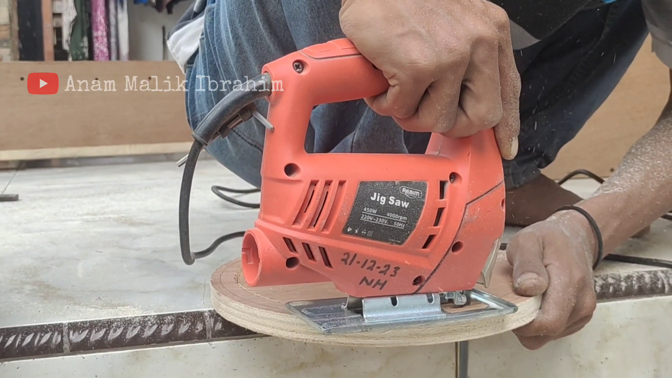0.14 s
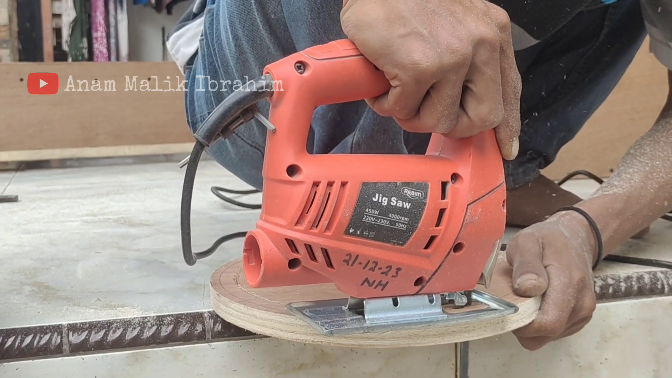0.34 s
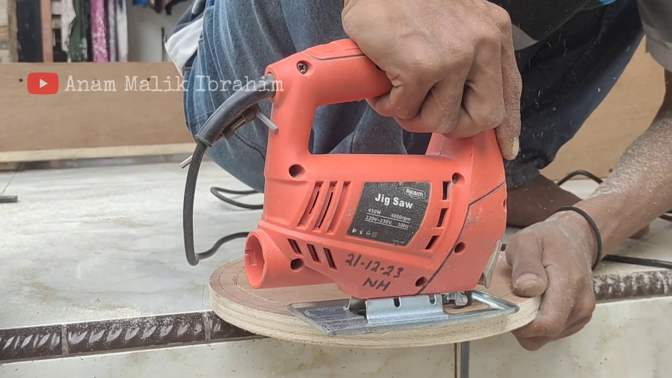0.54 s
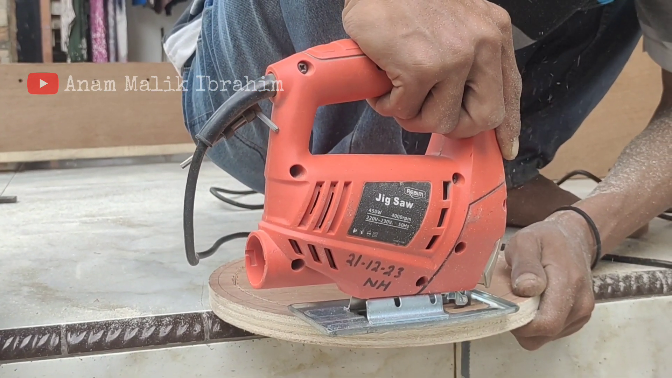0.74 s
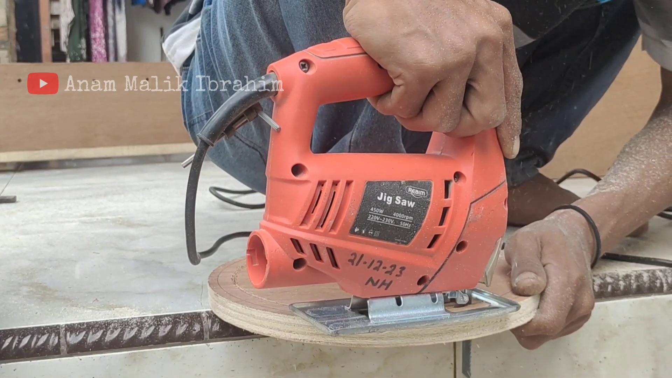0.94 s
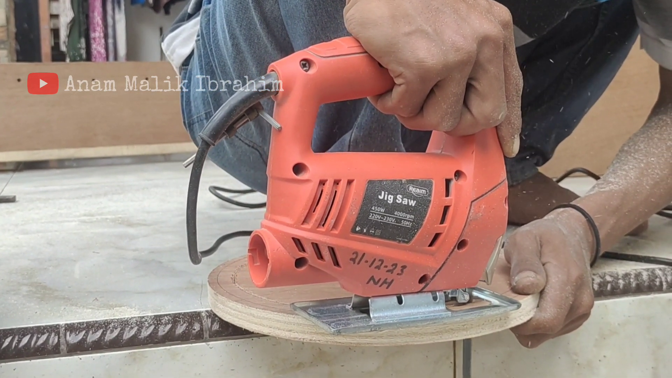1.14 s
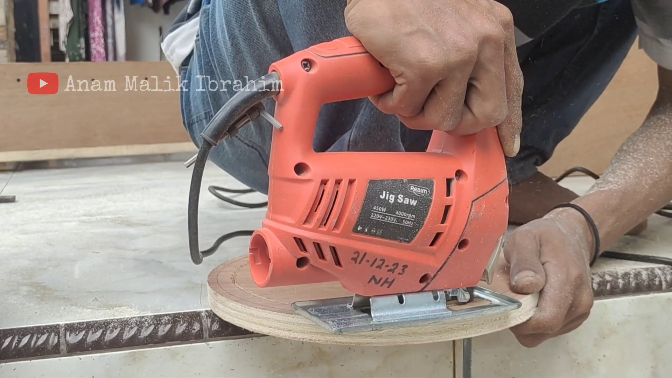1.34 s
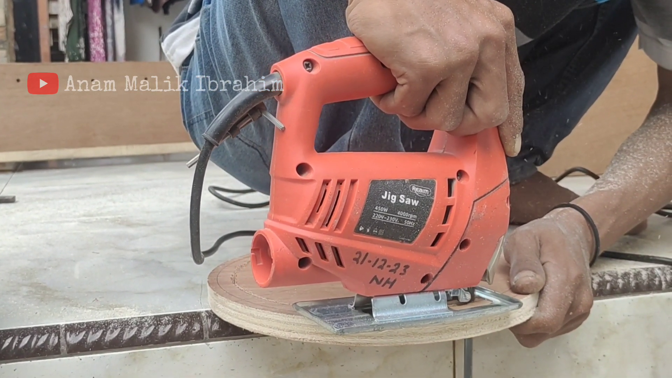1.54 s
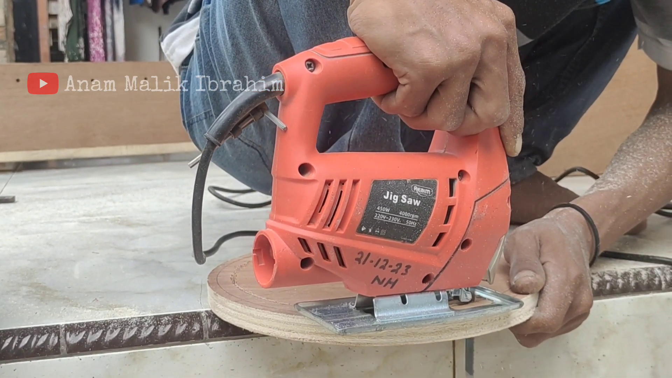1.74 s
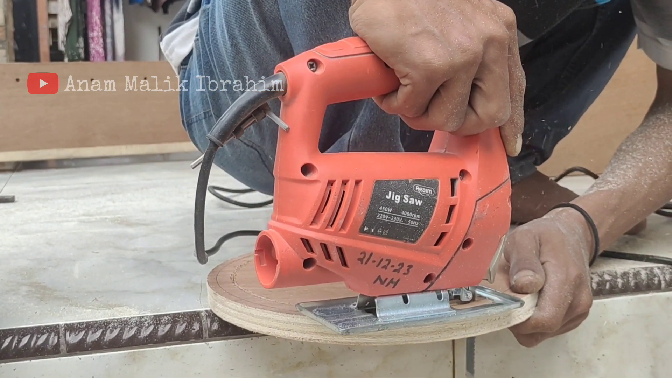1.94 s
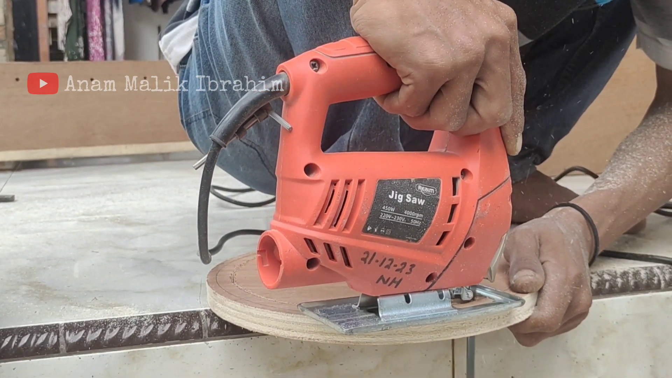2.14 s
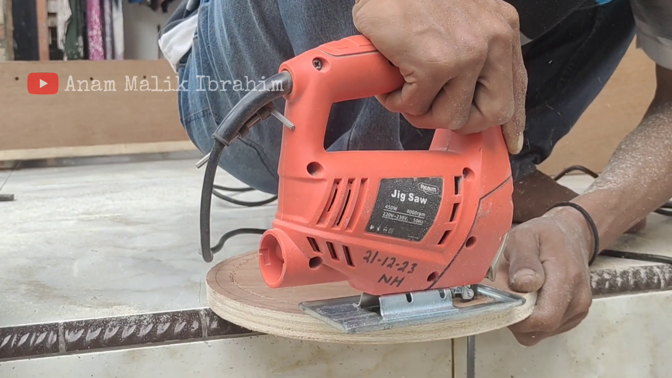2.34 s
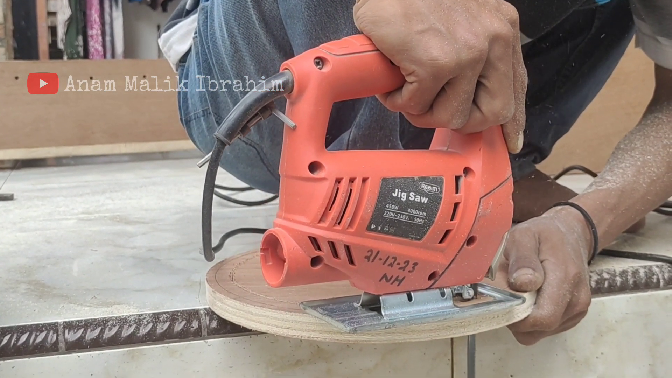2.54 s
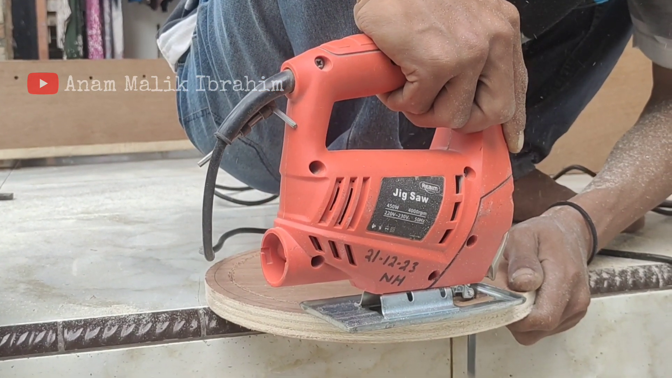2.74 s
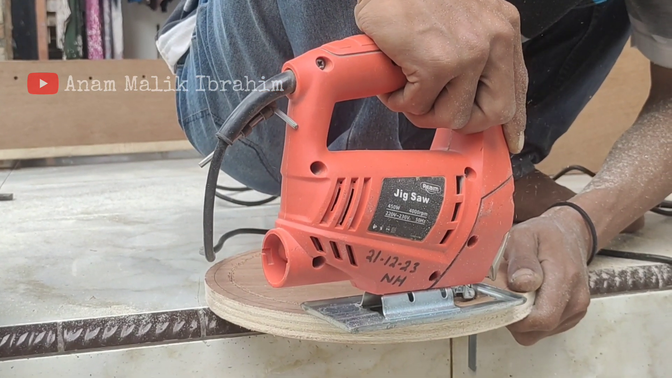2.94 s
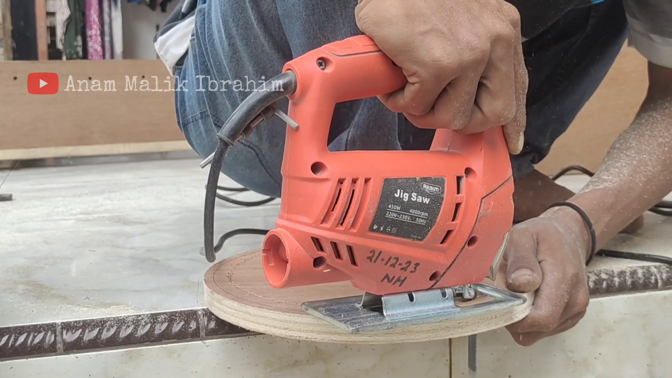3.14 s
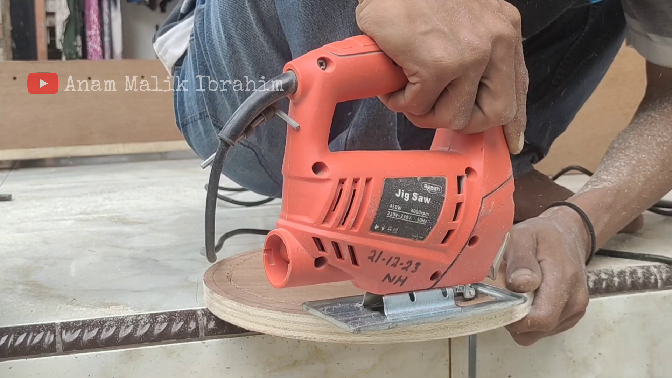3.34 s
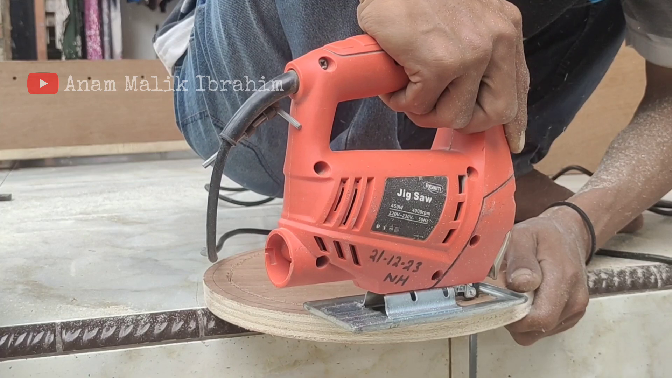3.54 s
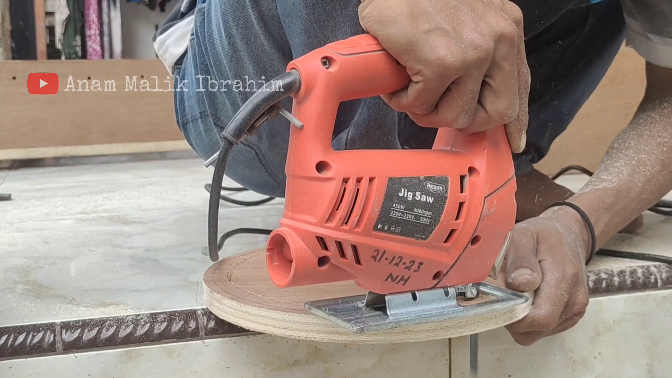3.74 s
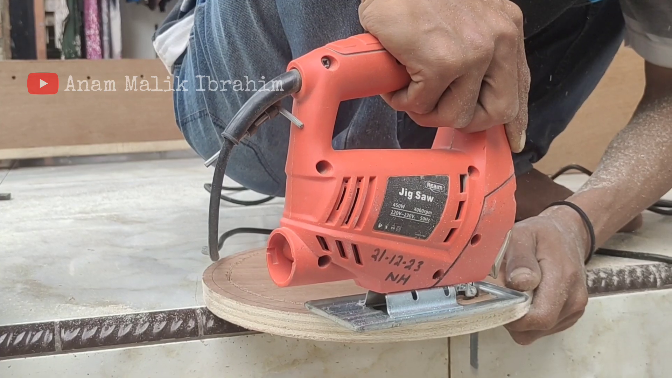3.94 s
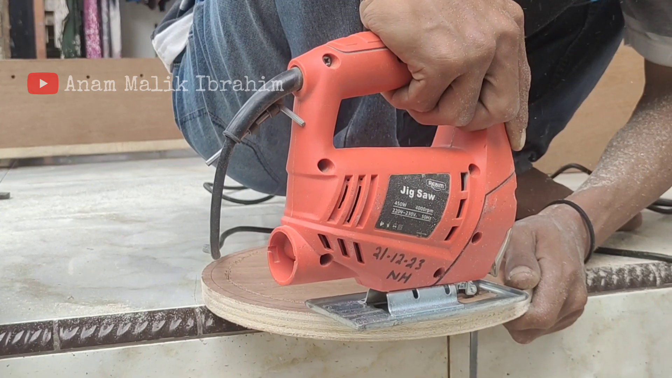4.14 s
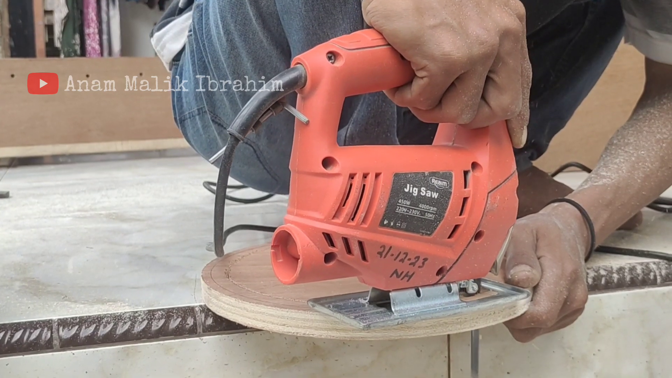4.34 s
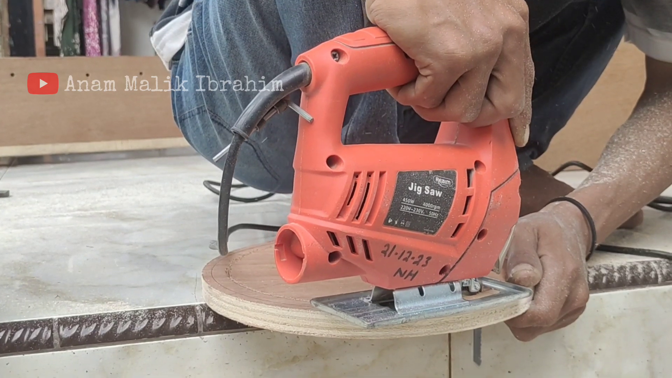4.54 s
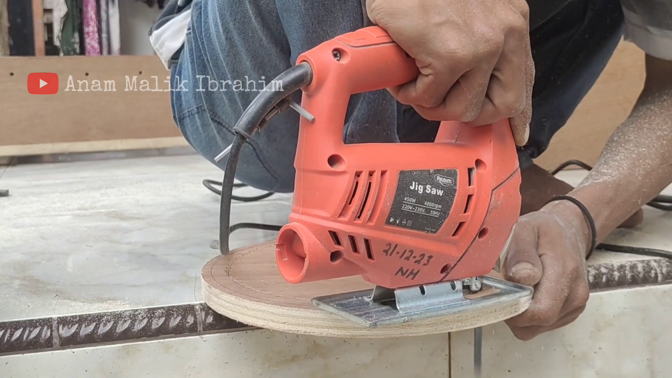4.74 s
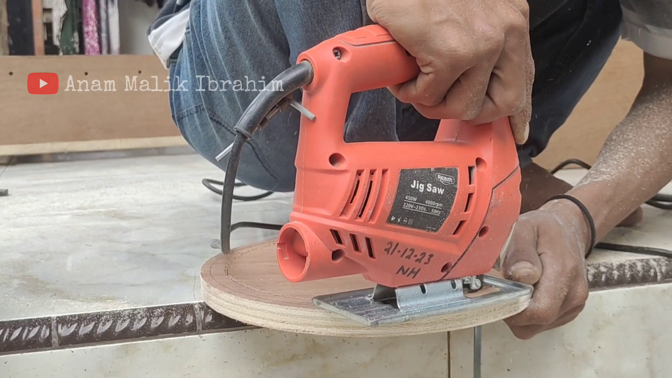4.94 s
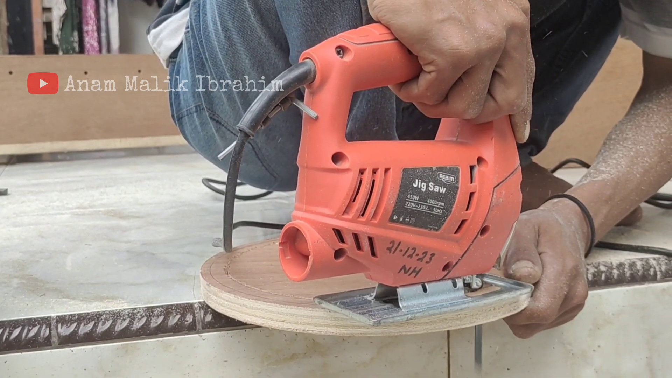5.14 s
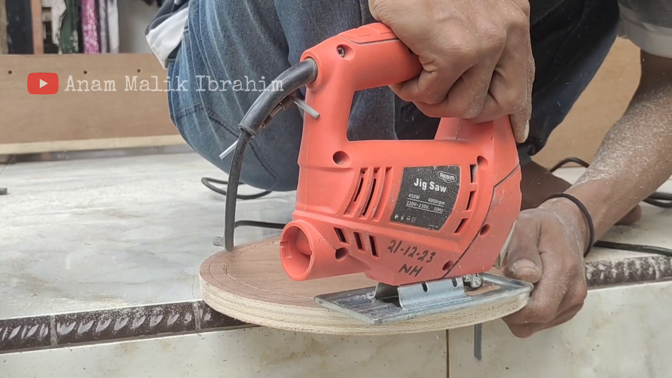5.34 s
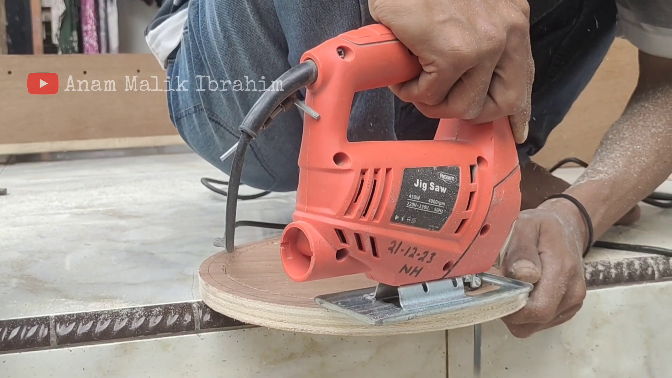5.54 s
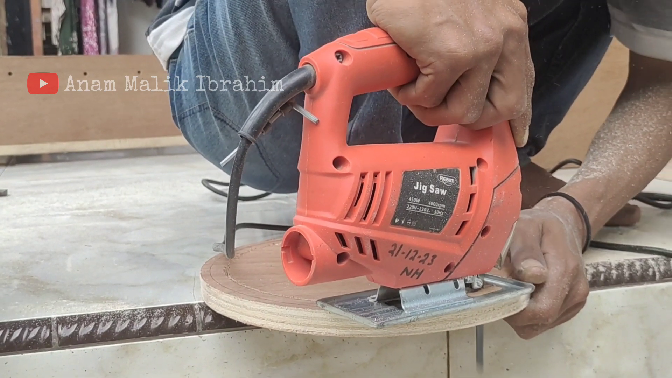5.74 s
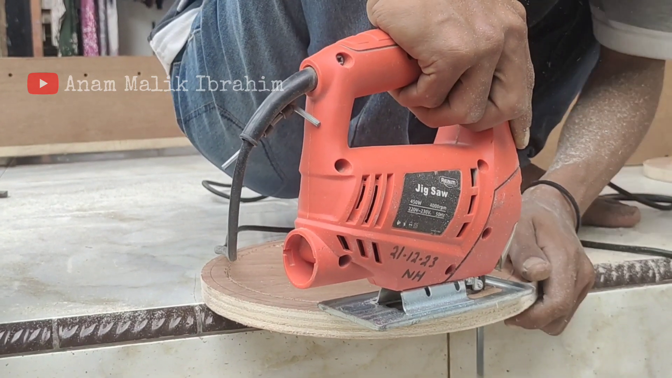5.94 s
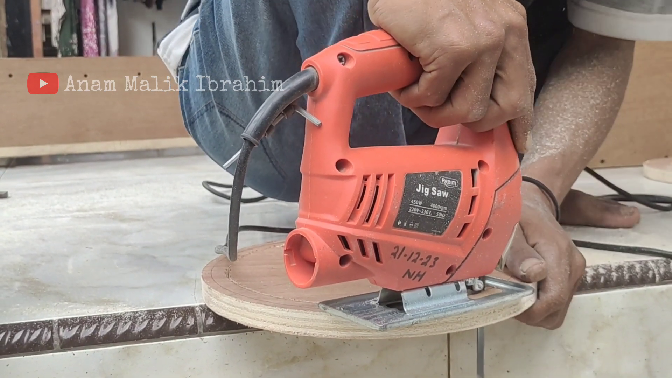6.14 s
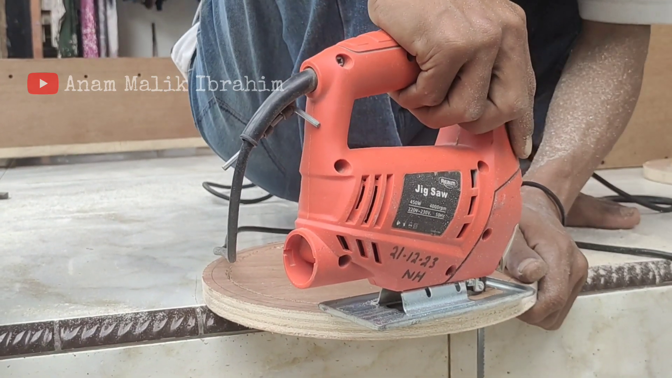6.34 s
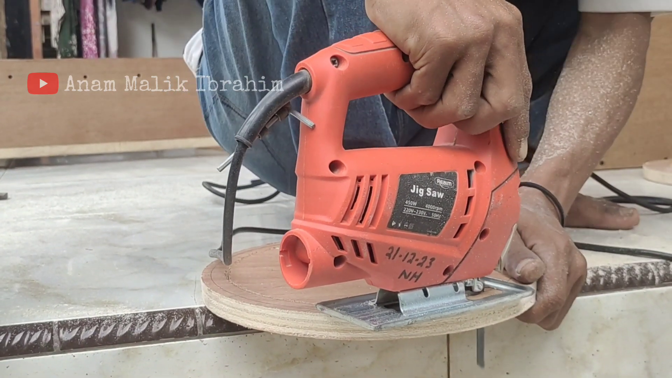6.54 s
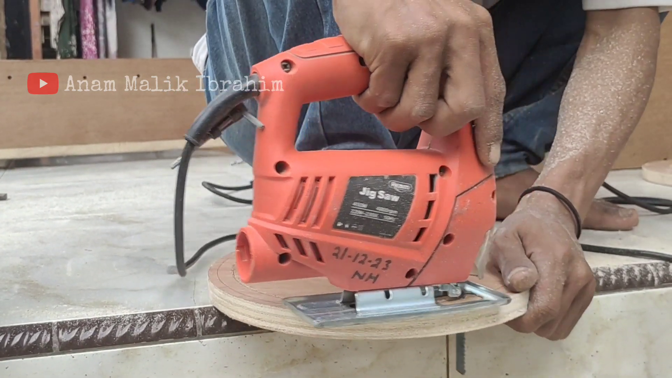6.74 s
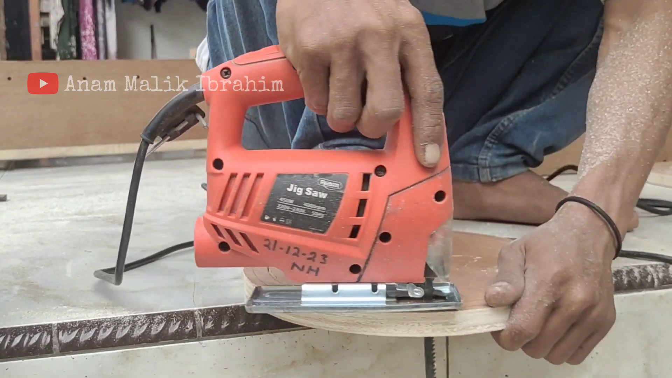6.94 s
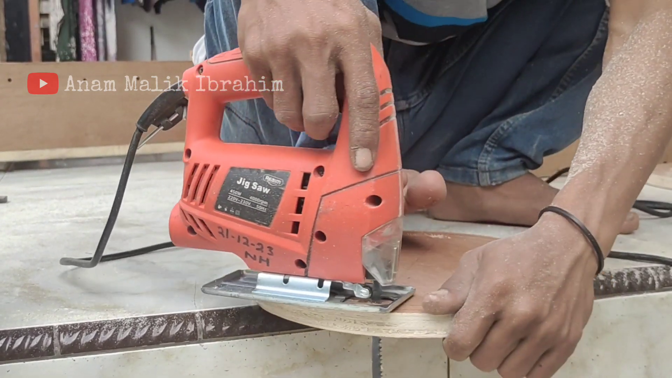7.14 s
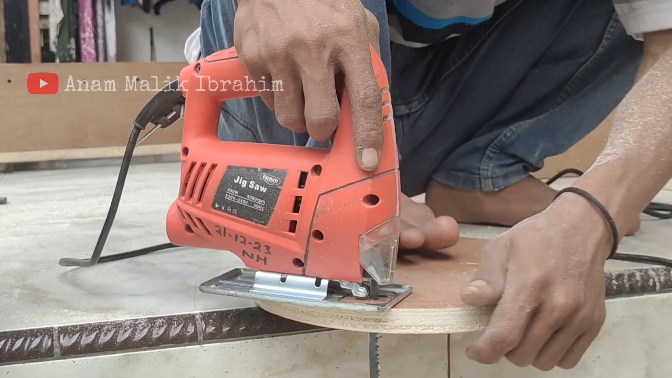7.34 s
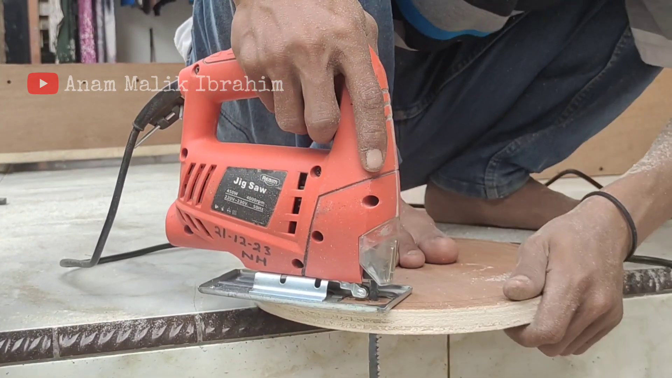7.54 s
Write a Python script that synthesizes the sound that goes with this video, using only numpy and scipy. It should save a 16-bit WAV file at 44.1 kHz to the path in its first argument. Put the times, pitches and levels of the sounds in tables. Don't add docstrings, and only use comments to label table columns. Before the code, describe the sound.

Steady, coarse electric saw drone, already running at the start, with metallic gear chatter, rapid stroke knocking and woody hum, wavering slightly with hand pressure. Near the end the motor is let go and winds down for over a second, the knocks spreading apart until it stops. Faint finger ticks on the plastic shell remain over still indoor air. Close, wide stereo pickup.

```python
import sys
import numpy as np
from scipy import signal
from scipy.fft import rfft, irfft
from scipy.io import wavfile

SR = 44100
rng = np.random.default_rng(int(sys.argv[2]) if len(sys.argv) > 2 else 0)


def gain_from_db(level_db):
    decades = np.asarray(level_db, float) / 20
    return 10 ** decades


def generate_wav(signal):
    frames = np.transpose(np.atleast_2d(signal))
    scaled = np.clip(frames, -1, 1) * 32767
    pcm = np.round(scaled).astype(np.int16)
    wavfile.write(sys.argv[1], SR, pcm)


N = 339570
T = np.arange(N) / SR
HZ = np.fft.rfftfreq(N, 1 / SR)
FULL_RATE = 41


def evened(x):
    return x / np.sqrt(np.mean(x ** 2, -1, keepdims=True) + 1e-20)


def read(points, hz):
    f, value = np.transpose(points)
    return np.interp(np.log(hz + 1), np.log(f + 1), value)


def drift(count, hz):
    steps = rng.standard_normal((count, N // 64 + 2))
    slow = evened(signal.lfilter(*signal.butter(2, hz * 128 / SR), steps))
    return np.repeat(slow, 64, 1)[:, :N]


def ring(x, modes, low_hz):
    hz = abs(np.fft.fftfreq(8192, 1 / SR))
    power = sum(gain_from_db(db) ** 2 / (1 + (2 * (hz - f) / width) ** 2) ** 1.704 for f, width, db in modes)
    log_gain = np.log(power / (1 + (low_hz / (hz + 1)) ** 8) + 1e-10) / 2
    taps = np.fft.ifft(np.exp(np.conj(signal.hilbert(log_gain)))).real[:4096]
    return signal.oaconvolve(x, taps[None] / np.linalg.norm(taps), axes=1)[:, :N]


def shaped(points):
    spectrum = rfft(rng.standard_normal((2, N)))
    return evened(irfft(spectrum * gain_from_db(read(points, HZ)), N))


def bursts(train, decay_s, noise):
    t = np.arange(2000) / (decay_s * SR)
    puff = np.exp(-t) * (1.3 - np.exp(-6 * t))
    return signal.oaconvolve(train, puff)[:N] * noise


def whole(turns):
    return np.diff(np.floor(turns), prepend=0) > 0


def crossings(turns, spread_db):
    return whole(turns) * gain_from_db(spread_db * np.clip(rng.standard_normal(N), -2, 2))


def worn(turns, share):
    place = (turns % 1 * 1024).astype(int)
    pattern = rng.standard_normal((2, 1024))[:, place]
    return np.sqrt(share) * pattern + np.sqrt(1 - share) * rng.standard_normal((2, N))


LET_GO_S, LET_GO_RATE = 5.745, 41.4
FRICTION, DRAG = 24.476, .0114667


def coasting():
    even = np.sqrt(FRICTION / DRAG)
    left = np.arctan(LET_GO_RATE / even) - FRICTION / even * np.clip(T - LET_GO_S, 0, None)
    return even * np.tan(np.clip(left, 1e-4, None))


# start_s, rate_strokes_per_s, feed_db (pressure, as level of the upper hum)
SPEED = [(0.0, 41.2, -49), (0.08, 41.0, -53.5), (0.13, 41.1, -54.5), (0.32, 40.9, -50.5), (1.95, 41.2, -51),
         (2.3, 41.1, -52.5), (2.62, 40.6, -53), (2.76, 40.6, -47.5), (2.86, 40.7, -54), (3.12, 41.0, -50.5),
         (3.4, 41.2, -52), (4.35, 41.6, -47.5), (4.7, 41.4, -49.5), (5.74, 41.4, -47)]
CRANK_AT_LET_GO = .2548


def motor():
    start_s, held, feed = np.transpose(SPEED)
    rate = np.where(T < LET_GO_S, np.interp(T, start_s, held), coasting())
    crank = np.cumsum(rate) / SR
    crank -= (crank[round(LET_GO_S * SR)] - CRANK_AT_LET_GO) % 1
    return rate, crank, np.interp(T, start_s, feed)


# full_speed_db, feed_share, knee_strokes_per_s,
# fall_db (per halving below the knee), wander_db
LAYERS = [(-43.5, -0.24, 7.7, 12.5, 0.26), (-51, 0.036, 27, 10, -0.15), (-65.5, .1, 27, 7.5, 1.5)]
UNLOADED_DB, UNLOAD_S = (2.5, 5, -1), 0.5
MEAN_FEED_DB = -49.5
HALF_TURN_SAG_DB, SAG_RATE, SAG_LATE = 28, 3.5, 6.2


def levels(turns, rate, feed_db):
    db, share, knee, halving_db, wander_db = np.transpose(LAYERS)[:, :, None]
    loose = np.clip((T - LET_GO_S) / UNLOAD_S, 0, 1) * np.array(UNLOADED_DB)[:, None]
    sag = HALF_TURN_SAG_DB * ((2 * turns % 1) ** SAG_LATE - .2) / (1 + (rate / SAG_RATE) ** 2)
    slow = halving_db * np.log2(1 + (knee / rate) ** 2) / 2
    fed = share * (feed_db - MEAN_FEED_DB)
    return db + fed + loose - sag - slow + wander_db * drift(count=3, hz=2.5)


# stroke_multiple, level_db
MULTIPLES = [(1, -54), (2, -39), (3, -25), (4, -30.5), (5, -24.5), (6, -29.5), (7, -13.5), (8, -17.5),
             (9, -8), (10, -7), (11, -1), (12, -11.5), (13, -32), (14, -35), (15, -10.5), (16, -1.5),
             (17, 2), (18, -5.5), (19, -3.5), (20, -5.5), (21, -8.5), (22, -17), (23, -25)]
# stroke_multiple, level_db
LATER = [(1, -57.5), (2, -38), (3, -28.5), (4, -36), (5, -23), (6, -29), (7, -15), (8, -19.5), (9, -4.5),
         (10, -11), (11, -7.5), (12, -12), (13, -13), (14, -21), (15, -13.5), (16, 0.5), (17, 0),
         (18, -4.5), (19, -9.5), (20, -3.5), (21, -8), (22, -22), (23, -18)]
# pitch_hz, level_db
SWEEP = [(200, -20), (300, -14.5), (400, -1), (460, -6.5), (520, -19), (610, -8.5), (690, -1), (950, -6)]
LOW_HUM_DB, LOW_HUM_SHARE, LOW_HUM_FALL = -54.5, 0.46, 30
FREE_MULTIPLES, FREE_DB_PER_STEP, FREE_S = (11, 17), -5, .25


def hum(turns, rate, feed_db):
    low_db = LOW_HUM_DB + LOW_HUM_SHARE * (feed_db - MEAN_FEED_DB)
    low_db = low_db + LOW_HUM_FALL * np.log10(rate / FULL_RATE) + drift(count=1, hz=2.3)[0]
    low, high = gain_from_db(low_db + 2.5), gain_from_db(feed_db + 0.5)
    moved = np.interp(T, [3.4, 3.9, 5.75, 5.82], [0, 1, 1, 0])
    freed = np.clip((T - LET_GO_S) / FREE_S, 0, 1)
    waver, out = drift(count=len(MULTIPLES), hz=9.8), np.zeros(N)
    for (k, db), (_, late_db), w in zip(MULTIPLES, LATER, waver):
        group = low if k < 14 else high
        sunk = (1 + (290 / (FULL_RATE * k)) ** 4) / (1 + (290 / (rate * k)) ** 4)
        size = (gain_from_db(db) + moved * (gain_from_db(late_db) - gain_from_db(db))) * group * sunk
        size *= gain_from_db((T > LET_GO_S) * (read(SWEEP, rate * k) - read(SWEEP, LET_GO_RATE * k)))
        steps_away = min(abs(k - m) for m in FREE_MULTIPLES)
        size *= gain_from_db(FREE_DB_PER_STEP * steps_away * freed)
        out += size * (1 + 0.19 * w) * np.sin(2 * np.pi * (k * turns + rng.random()))
    return np.array([out, .05 * out])


# stroke_multiple, level_db
WHINE = [(114.8, -14), (172.2, -10), (229.6, -13), (344.4, -8)]


def whine(turns):
    fuzz = drift(count=len(WHINE), hz=90)
    return sum(gain_from_db(db) * (0.24 + w) * np.sin(2 * np.pi * k * turns) for (k, db), w in zip(WHINE, fuzz))


# pitch_hz, width_hz, level_db
HOUSING = [(1902, 337, 2), (2352, 212, 2), (3736, 595, -9), (4476, 1230, -13)]
# pitch_hz, width_hz, level_db
STEEL = [(5370, 180, 2.5), (6300, 280, 0), (7090, 520, 11.5), (8070, 1020, 6), (9150, 500, 0.5),
         (14200, 1300, -20.5)]
TEETH = 48
SINGLE_KNOCKS_S, SINGLE_TEETH_S = 5.94, 6.995


def gears(turns, rate, rattle_db):
    fast = T < SINGLE_KNOCKS_S
    ends = crossings(turns, 1.5) + gain_from_db(-1.5) * crossings(turns + .53, 1.5)
    slap = gain_from_db(-12) * crossings(2 * turns + .45, 2.2)
    noise = worn(turns, share=0.22)
    crank_knocks = bursts((ends + slap) * fast, 0.0031, noise)
    train = crossings(TEETH * turns, 0.68)
    teeth = bursts(train, 0.00042, noise) + 2.96 * train * np.array([[1], [0]])
    teeth /= np.sqrt(np.clip(rate, 1.5, None) / FULL_RATE)
    load = 1 + .45 * fast * np.cos(4 * np.pi * turns - .9)
    shaken = load * evened(teeth) + gain_from_db(3.5) * evened(crank_knocks)
    rattle = shaken + gain_from_db(-6.5) * whine(turns) * np.array([[1], [.7]])
    bright = gain_from_db(-10.0) * (rate / FULL_RATE) ** 0.13
    shell = evened(ring(rattle, HOUSING, low_hz=1330))
    steel = evened(ring(rattle, STEEL, low_hz=4200))
    return gain_from_db(rattle_db - 4.0) * (shell + bright * steel)


# pitch_hz, width_hz, level_db
BOARD = [(374, 67, -3), (384, 130, -3), (663, 280, -2.5), (852, 143, 0)]
# pitch_hz, width_hz, level_db
KERF = [(1047, 260, -22), (1382, 294, 8), (1760, 190, -4)]


def board(turns, rate, rumble_db):
    bite = 1 + .55 * np.cos(4 * np.pi * turns - .6)
    shake = bite * worn(turns, share=.06)
    tear = bite * worn(turns, share=.2)
    grip = gain_from_db(3.5) * (rate / FULL_RATE) ** 1.28
    sound = evened(ring(shake, BOARD, low_hz=295)) + grip * evened(ring(tear, KERF, low_hz=760))
    return gain_from_db(rumble_db - 2.0 + 0.45 * drift(count=1, hz=23)) * sound


# pitch_hz, level_db (per Hz)
FAN = [(35, -86), (60, -50), (238, -21), (448, -42), (553, -41), (682, -21), (946, -2), (2350, -6),
       (2970, -11.5), (7060, -19.5), (12700, -26.5), (14900, -21.5), (16000, -48)]


def fan(hiss_db):
    return gain_from_db(hiss_db + 17.5 + 1.03 * drift(count=1, hz=30)) * shaped(FAN)


def walls(x):
    t = np.arange(9000) / SR
    signs = rng.choice([-1., 1.], (2, len(t)))
    sparse = rng.random((2, len(t))) < .05
    tail = signs * sparse * gain_from_db(-60 * t / 0.3) * (t > .004)
    return signal.oaconvolve(x, evened(tail) / np.sqrt(len(t)), axes=1)[:, :N]


# pitch_hz, level_db (per Hz)
ROOM = [(15, -67), (25, -33), (43, -18), (97, -15), (127, -11), (195, -21.5), (335, -17.5), (363, -19),
        (1070, -32), (2050, -32.5), (11600, -43.5), (12500, -40), (16000, -51)]
ROOM_DB = -79.5
# pitch_hz, level_db
MAINS = [(102, -84), (333, -86)]


def room():
    tones = sum(gain_from_db(db + 2.0 * drift(count=1, hz=4)[0]) * np.sin(2 * np.pi * hz * T) for hz, db in MAINS)
    return gain_from_db(ROOM_DB + drift(count=1, hz=4.2)) * shaped(ROOM) + tones * np.array([[1], [.1]])


# pitch_hz, width_hz, level_db
THUD = [(313, 90, -12), (382, 150, -3), (674, 200, -13), (870, 1400, -12.5)]


def blows(rows, shell, steel, decay_s, db):
    trains, noise = np.zeros((3, N)), rng.standard_normal((2, N))
    for s, peak_db, dull_db, bright_db in rows:
        trains[:, round(s * SR)] = gain_from_db(peak_db + db + np.array([0, dull_db, bright_db]))
    body = ring(bursts(trains[0], decay_s, noise), shell, low_hz=1130)
    dull = ring(bursts(trains[1], 0.0066, noise), THUD, low_hz=240)
    bright = ring(bursts(trains[2], 0.62 * decay_s, noise), steel, low_hz=4200)
    return body + gain_from_db(3) * dull + gain_from_db(6.5) * bright


# peak_db, dull_db, bright_db
ENDS = [(-34, -10.5, -13.5), (-40.5, -8.5, -10.5)]
KNOCK_SPREAD_DB, DULL_DB_PER_RATE = 0.5, -0.0665
STALL_RATE, STALL_DB = 4.7, -16


def knocks(turns, rate):
    at = np.flatnonzero(whole(2 * turns) & (T > SINGLE_KNOCKS_S))
    end = np.floor(2 * turns[at]).astype(int) % 2
    db = np.array(ENDS)[end] + KNOCK_SPREAD_DB * rng.standard_normal((len(at), 3))
    stall = STALL_DB * np.minimum(STALL_RATE / rate[at], 1) ** 4
    db[:, 1] += DULL_DB_PER_RATE * (rate[at] - 10) + stall
    db[:, 2] += stall
    return blows(np.column_stack([T[at], db]), HOUSING, STEEL[:-1], 0.0044, db=-6.5)


TOOTH_DB, TOOTH_DULL_DB, TOOTH_BRIGHT_DB = -49.5, -14.5, -36
TOOTH_LEAD, TOOTH_STALL_RATE = .62, 0.89


def last_teeth(turns, rate):
    at = np.flatnonzero(whole(TEETH * turns + TOOTH_LEAD) & (T > SINGLE_TEETH_S))
    db = TOOTH_DB - 10 * (TOOTH_STALL_RATE / rate[at]) ** 4 + 1.2 * rng.standard_normal(len(at))
    rows = [(s, peak, TOOTH_DULL_DB, TOOTH_BRIGHT_DB) for s, peak in zip(T[at], db)]
    return blows(rows, HOUSING, STEEL[:-1], 0.0022, db=-5.5)


# start_s, peak_db, dull_db, bright_db
TICKS = [
    (7.1114, -70, -33, 2),
    (7.1192, -58, -9, -20),
    (7.1812, -51.5, -11.5, -7),
    (7.214, -63.5, -3, -18),
    (7.3469, -60, -30, -16),
    (7.351, -63, -14, -22),
    (7.4474, -77, -5, -3),
]
# pitch_hz, width_hz, level_db
TAP = [(1500, 500, -6), (2000, 500, 0), (3300, 1200, -8), (4400, 900, -4)]
# pitch_hz, width_hz, level_db
SNAP = [(6700, 900, -5), (7900, 600, 0), (10500, 2000, -12), (14000, 1200, -11)]


def handling():
    return blows(TICKS, TAP, SNAP, 0.0024, db=-4.5)


# pitch_hz, in_step_share, quarter_turn_share (of the side, against the middle)
PORTS = [(300, -0.0088, 0.71), (1000, 0.065, 0.48), (1500, -0.52, -0.45), (2000, 0.15, 0.4),
         (2500, -0.021, -0.45), (5500, 0.77, 0.21), (9000, -0.76, .3), (12760, 0.65, .45)]
# pitch_hz, side_minus_mid_db
WIDTH = [(60, -18), (110, -13), (200, -8), (380, -17.5), (700, -13.5), (1290, -8), (2380, -5.5), (4400, 0),
         (8120, -0.5), (15000, -0.5)]


def microphones(mid, side):
    hz, step, quarter = np.transpose(PORTS)
    shared = np.interp(HZ, hz, step) + 1j * np.interp(HZ, hz, quarter)
    own = np.sqrt(np.clip(1 - abs(shared) ** 2, 0, 1))
    side = rfft(mid) * shared + rfft(side) * own
    side = irfft(side * gain_from_db(read(WIDTH, HZ)), N)
    return np.array([mid + side, mid - side])


def scene():
    rate, crank, feed_db = motor()
    turns = np.minimum(crank, crank[round(SINGLE_TEETH_S * SR)])
    rattle_db, rumble_db, hiss_db = levels(crank, rate, feed_db)
    saw = hum(turns, rate, feed_db) + gears(turns, rate, rattle_db)
    saw += board(turns, rate, rumble_db) + fan(hiss_db)
    saw += knocks(crank, rate) + last_teeth(crank, rate) + handling()
    mid, side = saw + gain_from_db(-12.5) * walls(saw) + room()
    return microphones(mid, side)


def band_limit(x):
    return signal.sosfilt(signal.butter(12, 15480, fs=SR, output="sos"), x)


def record(dry):
    return band_limit(dry)


dry = scene()
out = record(dry)
generate_wav(out)
```